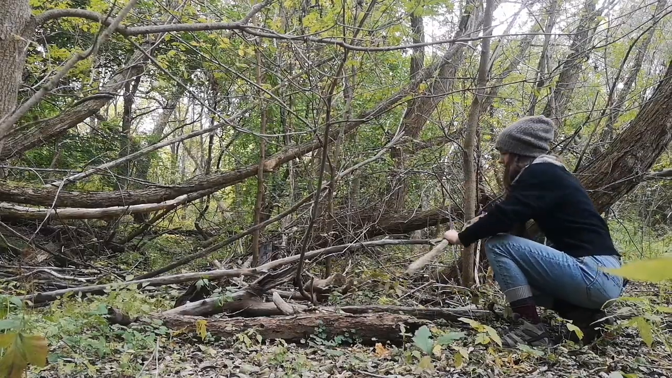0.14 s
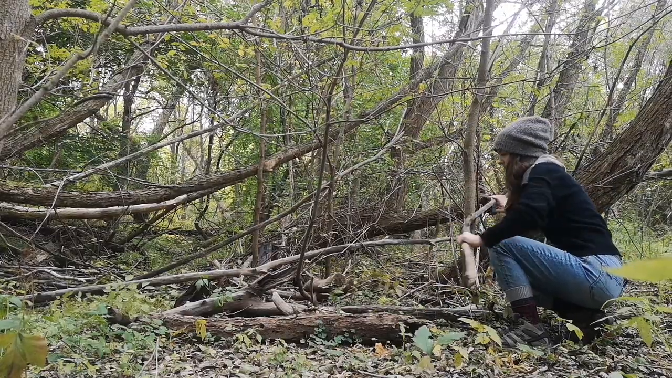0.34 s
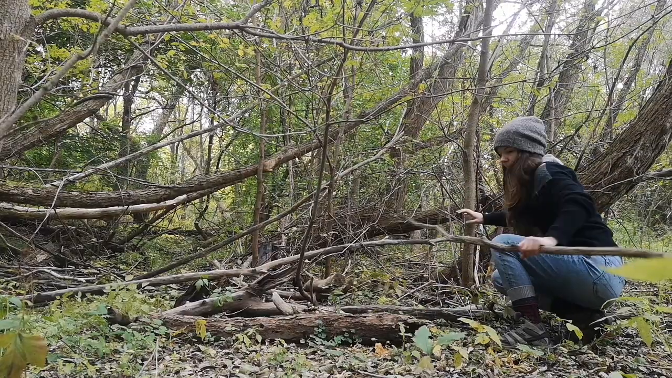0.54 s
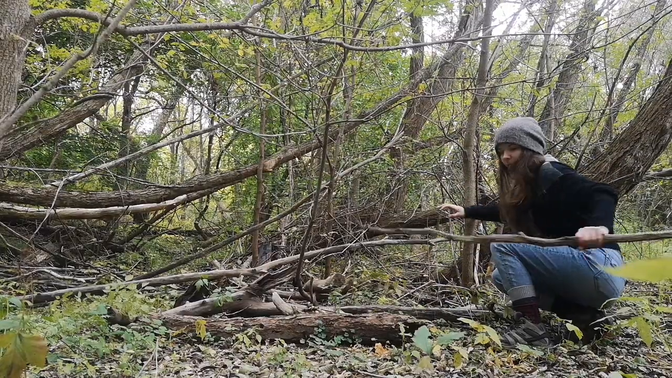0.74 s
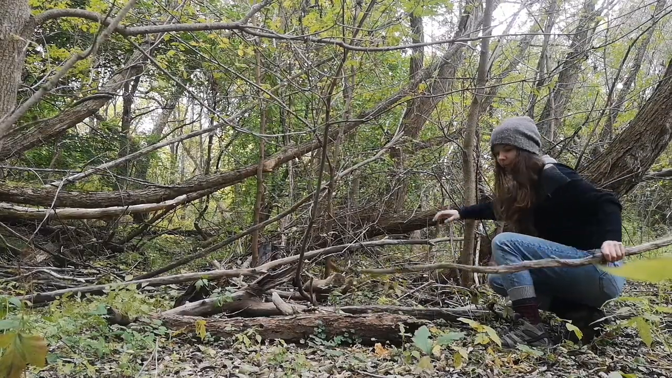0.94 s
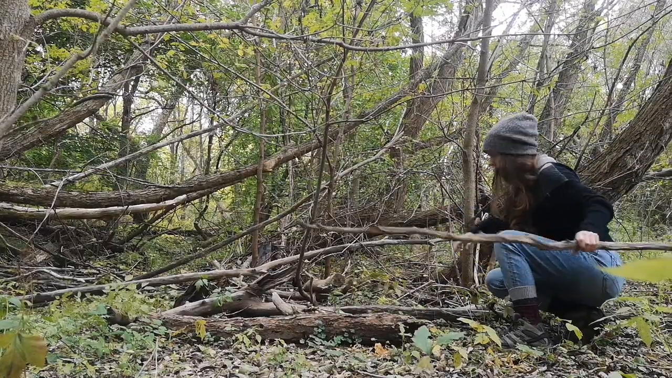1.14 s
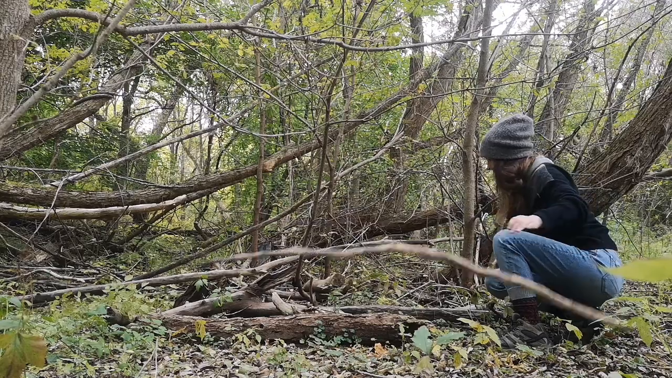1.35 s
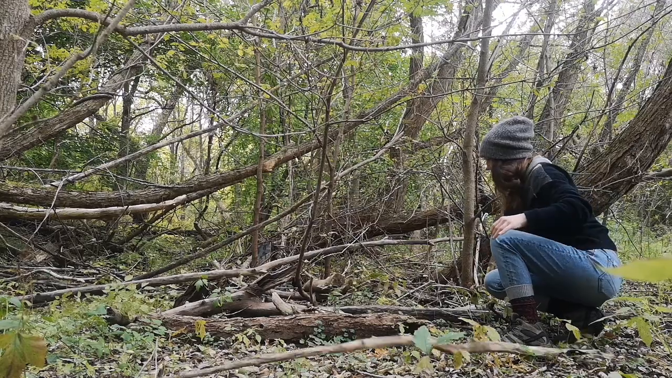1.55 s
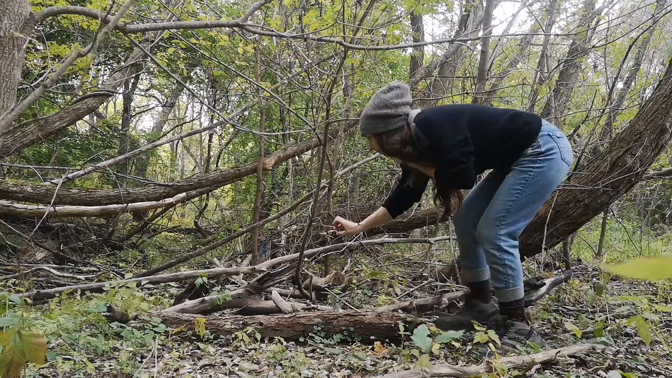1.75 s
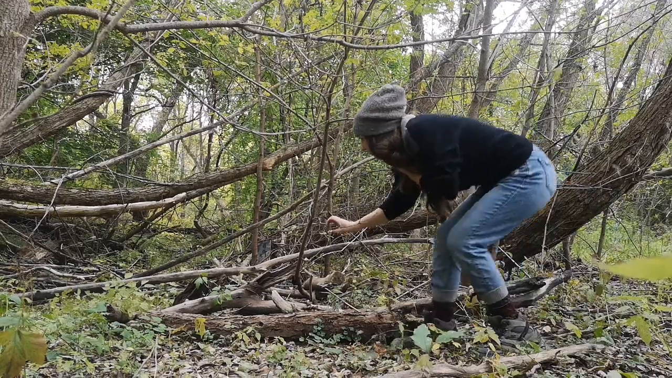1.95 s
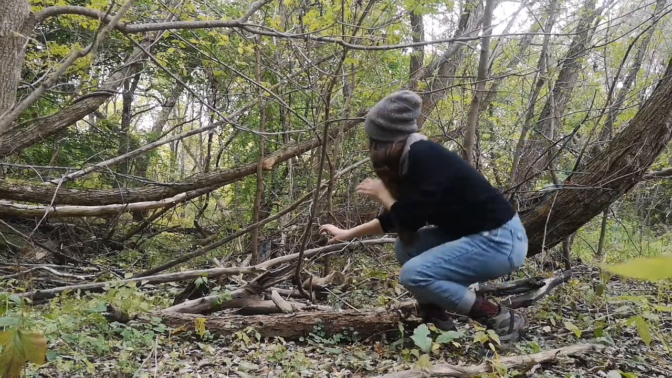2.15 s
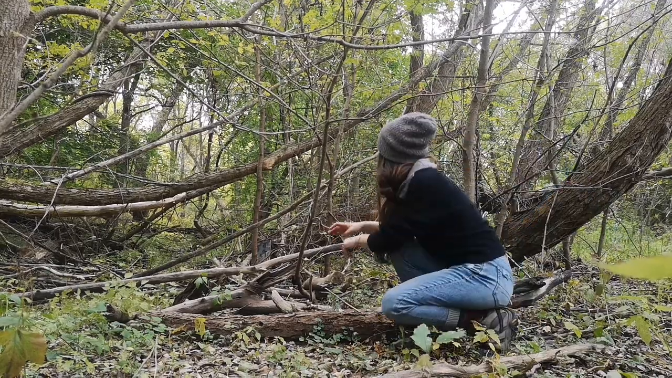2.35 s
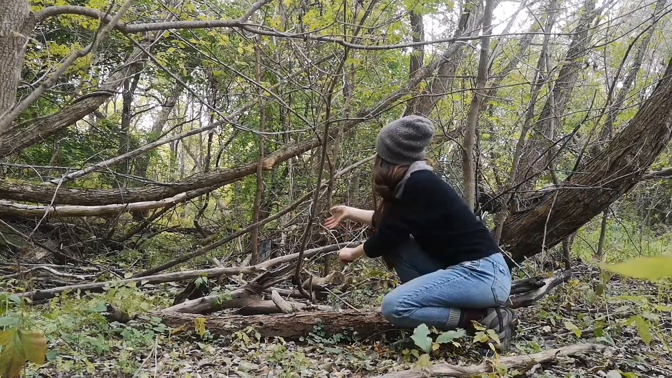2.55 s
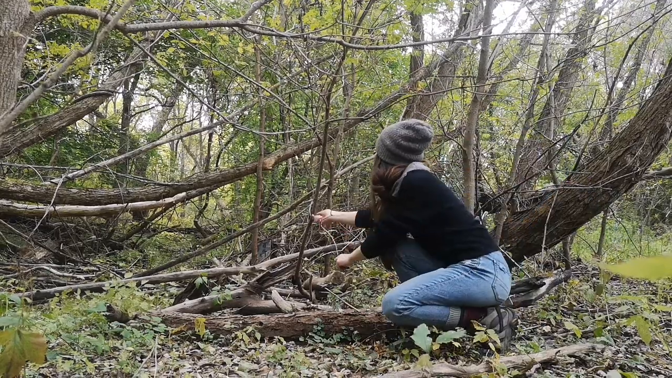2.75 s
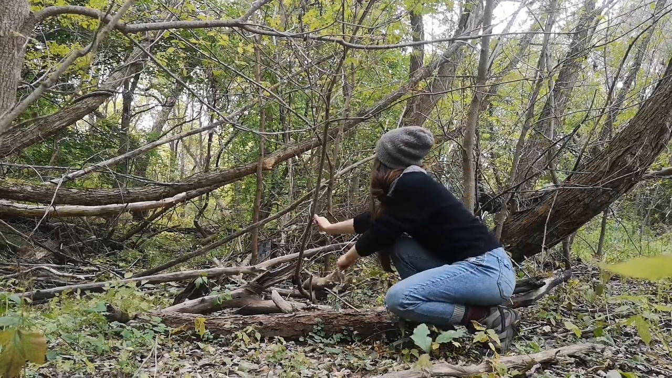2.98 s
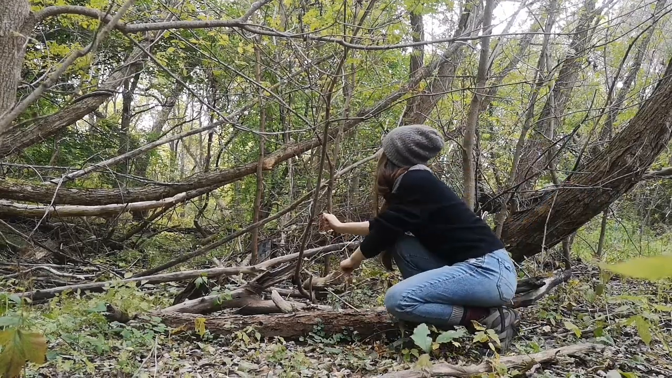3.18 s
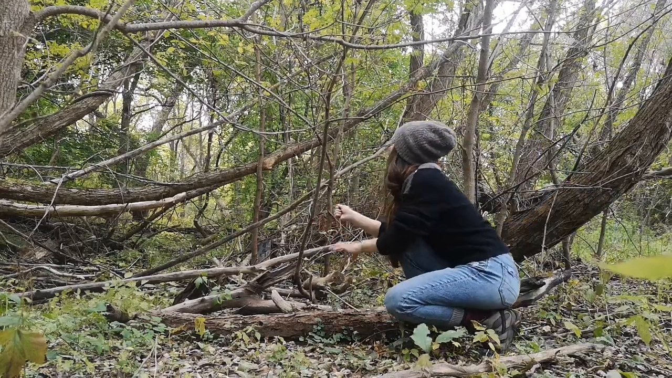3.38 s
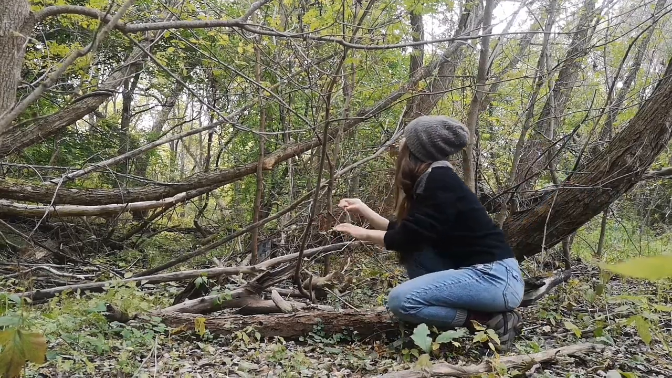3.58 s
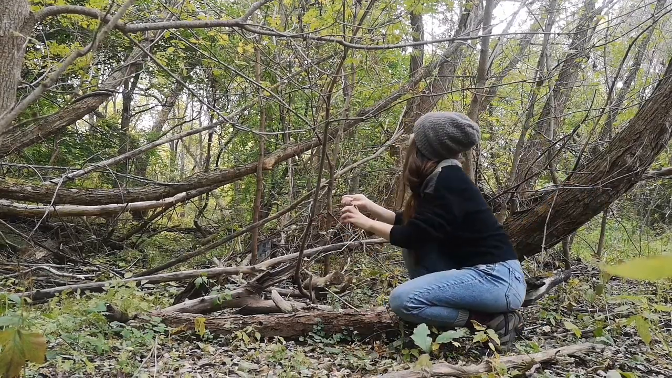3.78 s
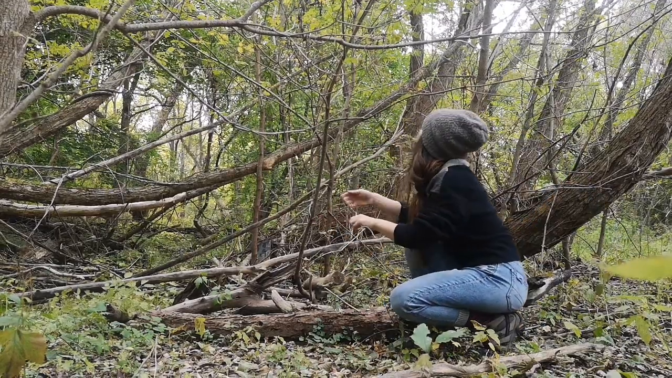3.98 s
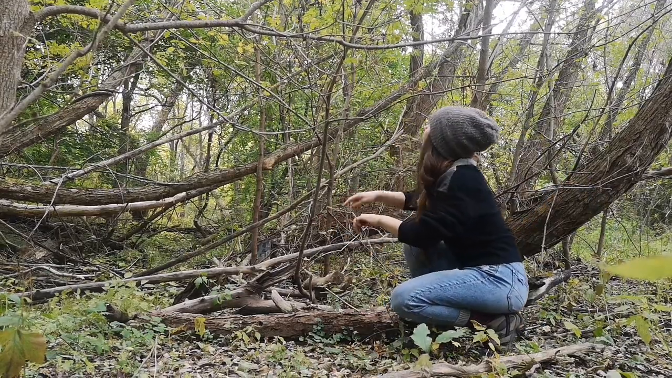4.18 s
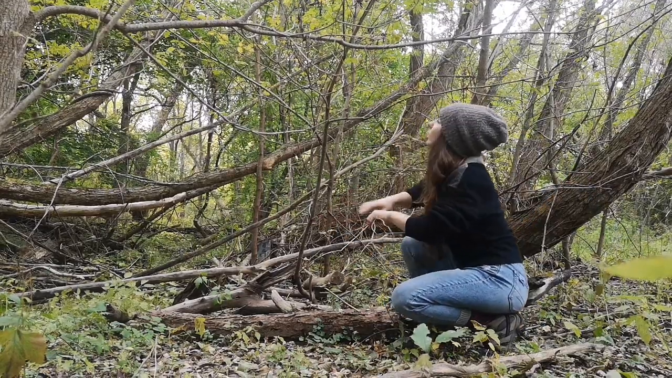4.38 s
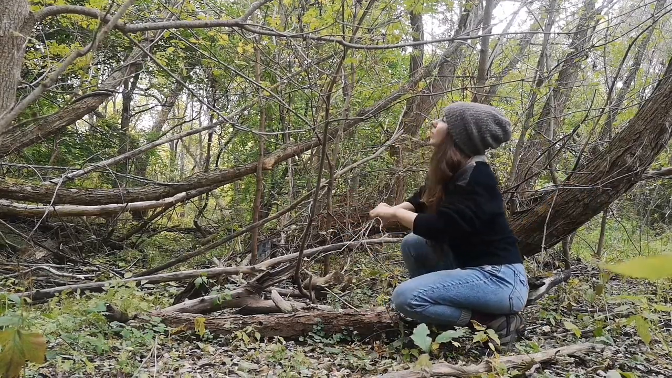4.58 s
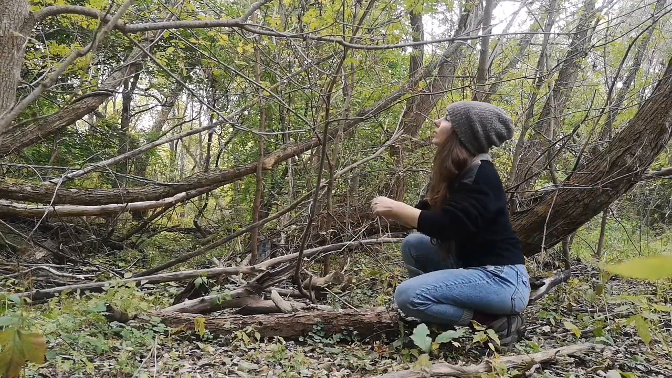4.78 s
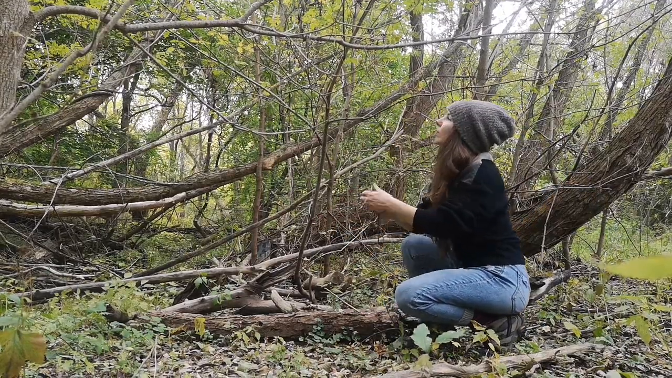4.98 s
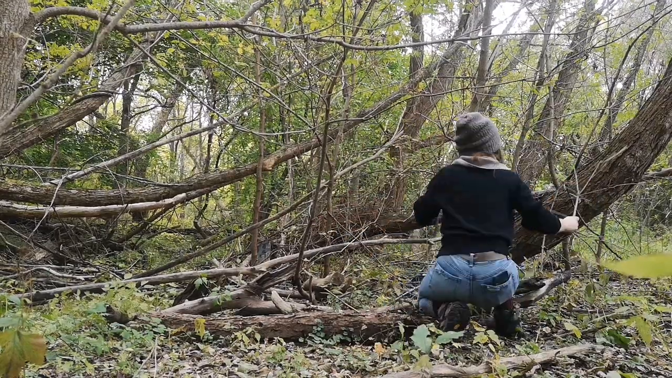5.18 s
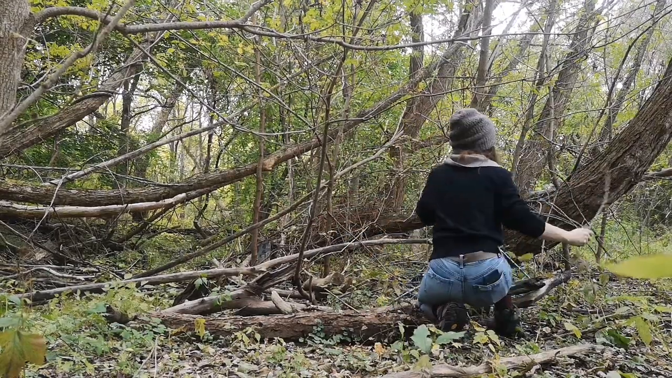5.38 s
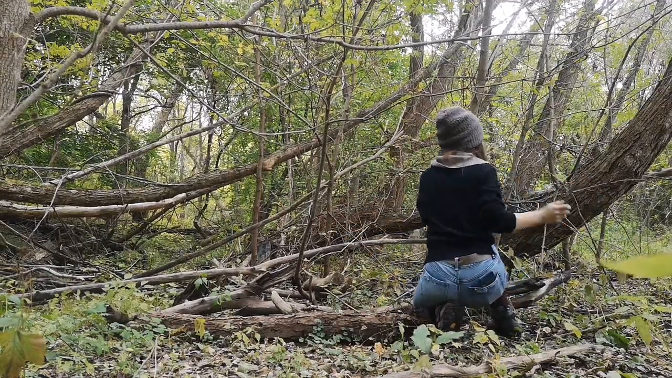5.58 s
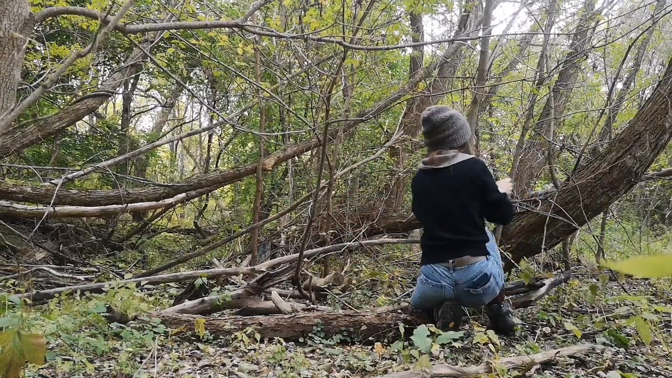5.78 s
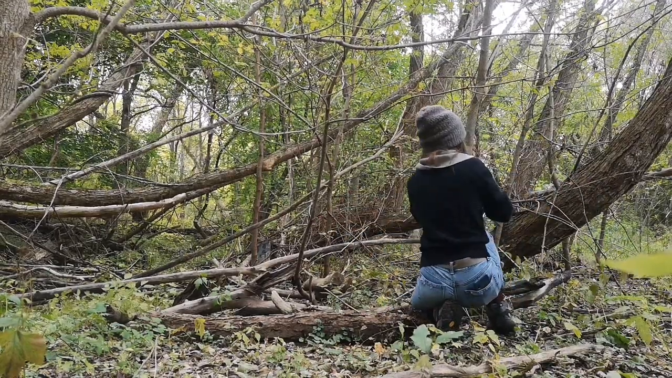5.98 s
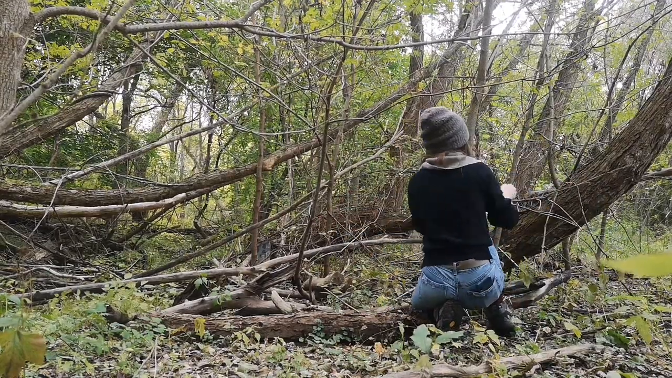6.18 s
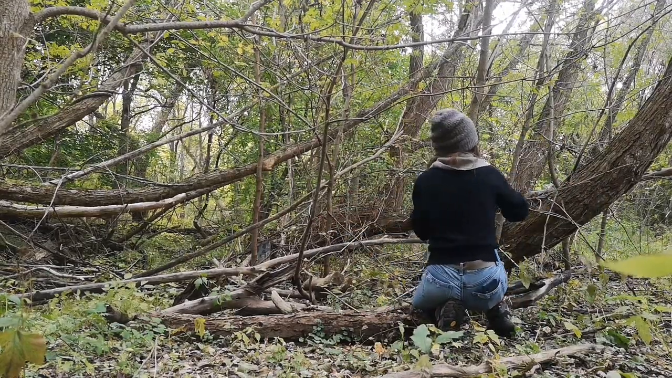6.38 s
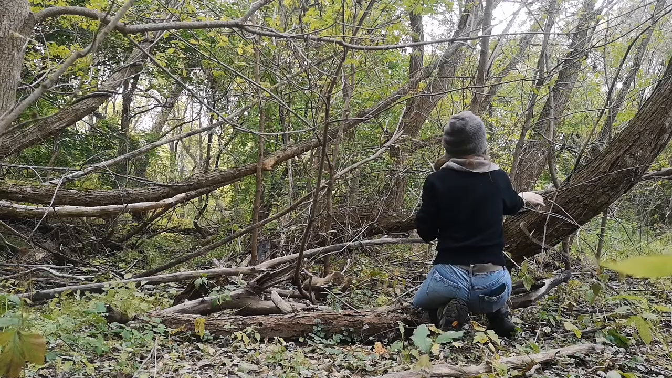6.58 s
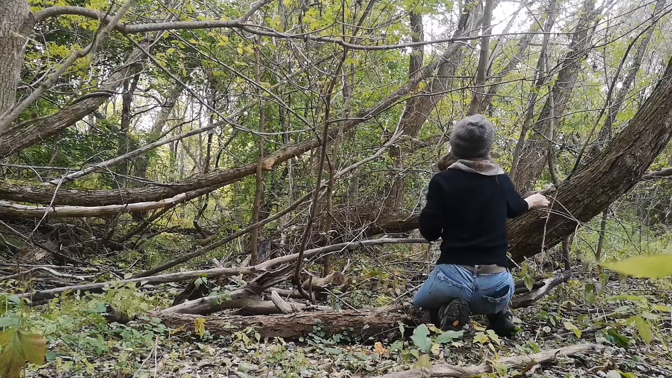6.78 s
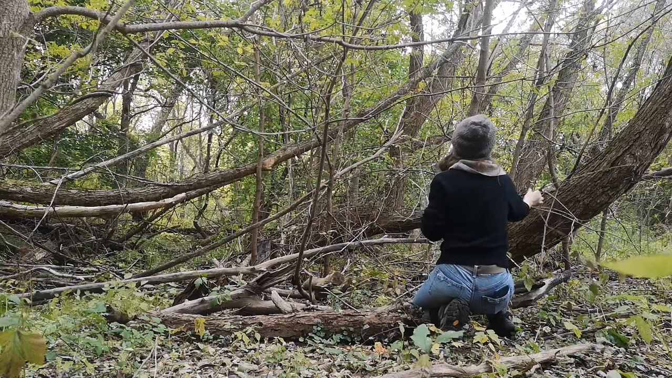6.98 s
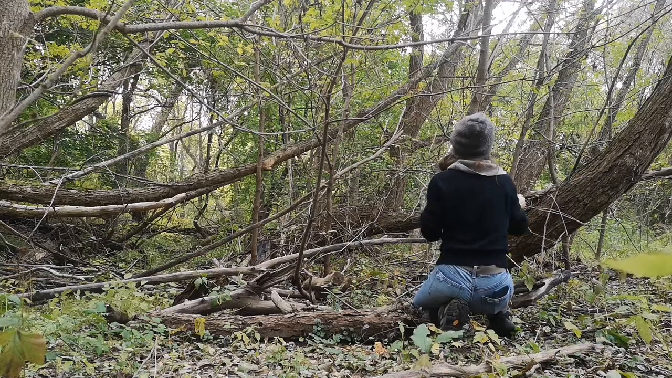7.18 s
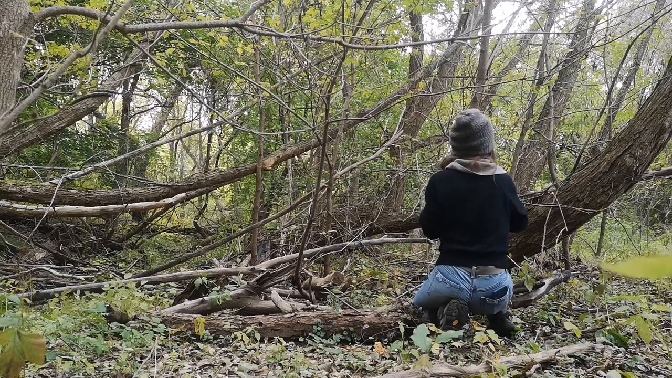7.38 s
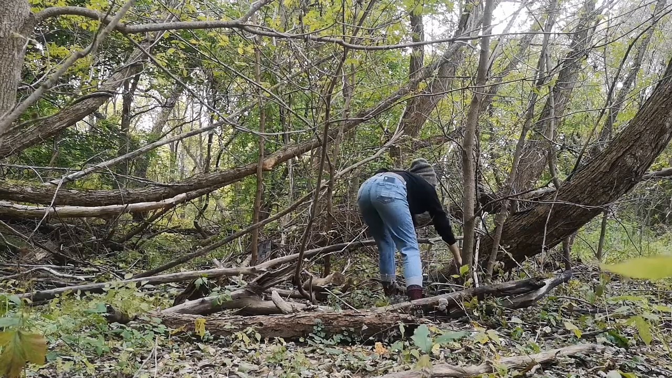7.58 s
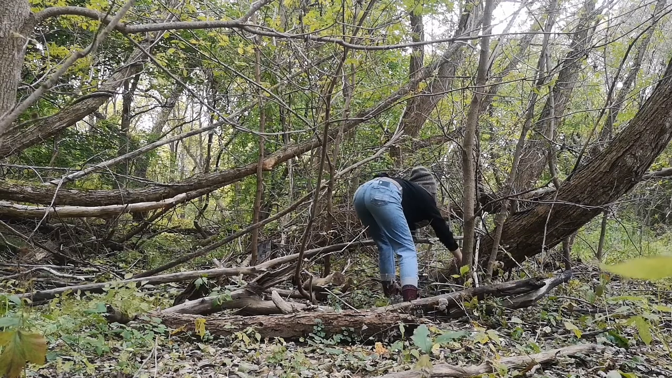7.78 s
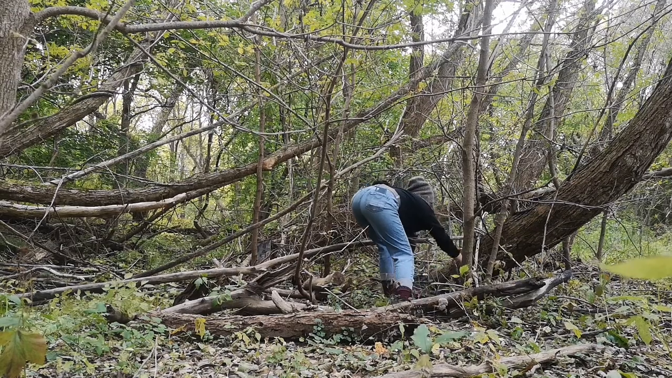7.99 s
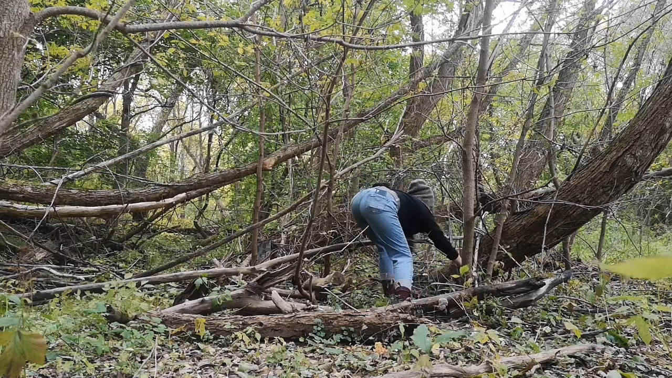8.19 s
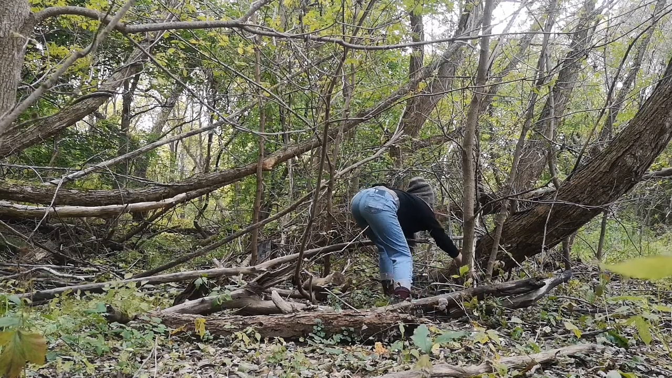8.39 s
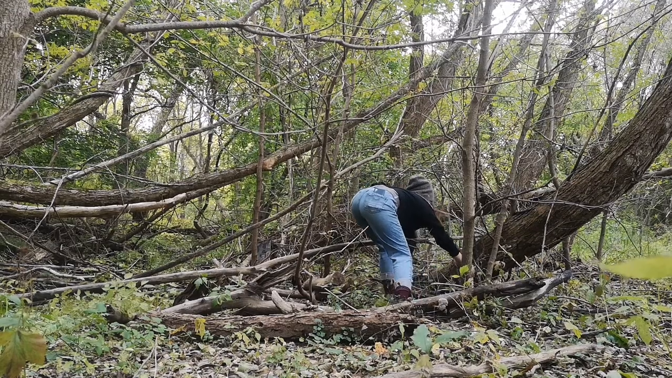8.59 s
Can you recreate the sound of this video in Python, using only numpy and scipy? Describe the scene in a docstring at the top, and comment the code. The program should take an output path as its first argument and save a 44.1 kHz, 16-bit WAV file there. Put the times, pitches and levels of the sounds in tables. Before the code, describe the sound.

Woodland with a low far-road rumble, strongest at first, and faint leaf hiss. At 0.2-0.4 s there is a light scuff, rustle and soft thud, then a tiny crack at 0.7. At 1.45-1.7 a thrown branch lands: quick sharp cracks, loudest near 1.54, hollow wooden knocks, low thuds and a grainy drag through leaves, slightly left. At about 1.73 the background cuts abruptly quieter with a short rustle. Small ticks lead to a very loud dry snap at 2.86, then brittle cracks at 3.9, 4.82 (strong and bright) and 5.28, with a rustle around 5.0 as the background rises slightly. Quiet litter movements follow, then another loud double-edged snap at 6.86. From 7.56 the background shifts subtly again, with a faint distant engine hum; cracks come at 7.71 and 7.84, and one with a deeper thump at 8.15, then light rustling to the end.

```python
"""Twigs snapped in a wood

Dry twigs are snapped by hand: volleys of fibre impulses rung through crack and twig spectra.
Brush, trunks and leaves scatter each crack back as dying noise, and a thrown branch drags and knocks on a log.
Boots and sleeves rustle the litter in noise and ticks, over thuds, bark scuffs and far traffic.
The background steps in level between four stretches."""
import sys
import numpy as np
from scipy import signal
from scipy.fft import rfft, irfft, next_fast_len
from scipy.io import wavfile
from scipy.ndimage import uniform_filter1d, map_coordinates

SR = 44100
rng = np.random.default_rng(int(sys.argv[2]) if len(sys.argv) > 2 else 0)


def write(x):
    x = np.atleast_2d(x).T
    wavfile.write(sys.argv[1], SR, np.round(np.clip(x, -1, 1) * 32767).astype(np.int16))

N = 381024
BINS = np.fft.rfftfreq(2048, 1 / SR)  # frequencies of the pulse spectra [Hz]
SPLIT_HZ = 7260  # brightness lifts what lies above and lowers what lies below

# background of each stretch: (start [s], traffic rumble [dB], tyre rush [dB], leaves in the crowns [dB])
STRETCHES = [(0, -46.5, -55.5, -60), (1.729, -58, -66.5, -71), (5.029, -54.5, -62.5, -65.5),
             (7.562, -53.5, -63, -66.5)]
# hiss of leaves and litter stirred or scattering sound: (frequency [Hz], relative density [dB])
SCATTER = [(880, -56.5), (1500, -12), (3450, -4.5), (5200, 0), (9100, 10.5), (14600, 1), (16000, -28.5)]
# hiss of leaves in the crowns and of the far wood: (frequency [Hz], relative density [dB])
LEAVES = [(1180, -35.5), (2000, -4), (2910, -5.5), (4490, -1), (5630, -4), (9010, 0.5), (11700, -6.5),
          (14700, -9.5), (15600, -20), (16000, -43)]
# near twigs and ground: (frequency [Hz], relative density [dB])
BRUSH = [(700, -21), (1500, -27), (3500, -15.5), (6000, -8.5), (9000, 4), (15000, -4.5), (16500, -13)]


def amp(db):
    """Decibels as a linear gain."""
    return 10 ** (np.asarray(db) / 20)


def unit(x):
    """x scaled to an rms of 1."""
    return x / np.sqrt(np.mean(x ** 2) + 1e-20)


def along(points, hz):
    """(Hz, value) points read along a log frequency axis."""
    f, v = np.transpose(points)
    return np.interp(np.log(hz + 1), np.log(f + 1), v)


def curves():
    """The background levels of the stretch that each sample falls in."""
    start, *levels = np.transpose(STRETCHES)
    stretch = np.searchsorted(start, np.arange(N) / SR, side="right") - 1
    return np.array(levels)[:, stretch]


def wobble(rate):
    """A smooth random curve, rate knots a second."""
    knots = rng.standard_normal(int(N * rate / SR) + 4)
    return map_coordinates(knots, [np.arange(N) * rate / SR])


def filtered(x, response):
    """x times a response of frequency."""
    m = next_fast_len(N + SR // 2)
    return irfft(rfft(x, m) * response(np.fft.rfftfreq(m, 1 / SR)), m)[..., :N]


def pulse(db):
    """The causal pulses with these dB spectra (one per row, on BINS), for sounds that start sharply."""
    cep = irfft(np.log(amp(np.maximum(db, -70))))
    half = cep.shape[-1] // 2
    # folding the cepstrum forward gives minimum phase
    cep[..., 1:half] *= 2
    cep[..., half + 1:] = 0
    return irfft(np.exp(rfft(cep)))


def diffuse(spectrum, grain_db=0, lead=15):
    """Stereo noise of rms 1, the right side lead samples late; grain_db spreads the sizes of its ticks."""
    # left-right likeness: (frequency [Hz], correlation)
    alike = [(60, 0.98), (250, 0.93), (1000, 0.65), (2500, 0.11), (8000, 0.11)]
    pair = rng.standard_normal((2, N)) * amp(grain_db * np.minimum(rng.exponential(size=N), 4))

    def shares(hz):
        turn = np.arccos(np.clip(along(alike, hz), -1, 1)) / 2
        return amp(along(spectrum, hz)) * [np.cos(turn), np.sin(turn)]

    mid, side = filtered(pair, shares)
    return unit(np.array([mid + side, np.roll(mid - side, lead)]))


def swells(start, hold, db, rise, t60):
    """Power of gestures that rise (longer ones more slowly), hold and die, each only within its own stretch."""
    t, edges = np.arange(N) / SR, np.transpose(STRETCHES)[0]
    power, stretch = np.zeros(N), np.searchsorted(edges, t)
    for s, h, level in zip(start, hold, db):
        attack = np.clip((t - s) / (rise + 0.24 * h), 0, 1)
        decay_db = 60 * np.maximum(t - s - rise - h, 0) / t60
        own_stretch = stretch == np.searchsorted(edges, s + rise + h / 2)
        power += (attack * amp(level - decay_db)) ** 2 * own_stretch
    return power


def crackle(level, rate, spread_db):
    """Separate small splinters and leaf stems breaking at random, rate a second, their size following level."""
    hits = (rng.random(N) < rate / SR) * rng.choice([-1, 1], N)
    sizes = amp(spread_db * np.minimum(rng.exponential(size=N), 3))
    tick = pulse(along(BRUSH, BINS))
    left = signal.fftconvolve(hits * sizes * level, tick / np.linalg.norm(tick))[:N]
    return np.array([left, np.roll(left, 6)])


def patchy(x, depth_db):
    """x with short random patches of gain in time and frequency."""
    z = signal.stft(x, nperseg=256)[2]
    field = uniform_filter1d(rng.standard_normal(z.shape[1:]), size=6, axis=0)
    field = uniform_filter1d(field, size=3, axis=1)
    gain = amp(depth_db * (unit(field) - depth_db / 8.7))  # the offset holds the mean power
    return signal.istft(z * gain, nperseg=256)[1][:, :N]


def traffic():
    """A far road: noise for rumble and tyre rush, wavering sines for engine hums; apart from it, a thin high
    whine."""
    # road rumble: (frequency [Hz], relative density [dB])
    rumble = [(12, -33), (20, -14.5), (54, 0), (92, -3), (119, -5), (166, -10.5), (201, -11), (400, -28.5),
              (520, -59), (880, -120)]
    # tyre rush: (frequency [Hz], relative density [dB])
    rush = [(150, -33), (250, -4.5), (501, -5), (949, -2), (1780, -10), (2110, -11.5), (4000, -18),
            (5200, -83)]
    # hums and whine: (start [s], end [s], frequency [Hz], width of its wander [Hz], mean level [dB])
    hums = [(0, 0.84, 58.9, 4.9, -48), (6.875, 7.32, 91.8, 8.7, -54), (7.56, 8.61, 109.7, 6.7, -53),
            (7.71, 8.68, 205.5, 11, -62), (8.052, 8.643, 293, 12, -64), (0, 1.45, 12040, 8, -76)]
    rumble_db, rush_db = curves()[:2]
    out = amp(rumble_db + 1.7 * wobble(2.9)) * diffuse(rumble)
    out += amp(rush_db + 1.4 * wobble(6)) * diffuse(rush)
    t = np.arange(N) / SR
    for start, end, hz, width, db in hums:
        pitch = hz + 0.2825 * width * wobble(width)
        tone = np.sin(2 * np.pi * np.cumsum(pitch) / SR)
        gate = np.clip(np.minimum(t - start, end - t) / 0.042, 0, 1)
        out += amp(db + 1.0 * wobble(8)) * gate * tone
    return out


def litter():
    """Dry leaves under boots and in the crowns: dense ticks whose level shivers, with separate crackles."""
    # boots and sleeves in the litter: (start [s], hold [s], level [dB])
    rustles = [(0.296, 0.64, -62.5), (0.308, 0.024, -50.5), (1.738, 0.2, -54), (3.27, 0.091, -68.5),
               (3.388, 0.02, -58.5), (4.984, 0.4, -53.5), (5.634, 0.38, -68.5), (5.91, 0.03, -53),
               (6.755, 0.082, -51.5), (7.219, 0.0076, -57), (7.294, 0.024, -58), (7.525, 0.063, -62),
               (7.708, 0.0094, -43.5), (8.297, 0.57, -62.5), (8.515, 0.012, -58.5)]
    crowns = amp(curves()[2])
    near = np.sqrt(swells(*np.transpose(rustles), rise=0.003, t60=0.2))
    hiss = crowns * diffuse(LEAVES, grain_db=2.5) + near * diffuse(SCATTER, grain_db=4.0)
    shiver = amp(1.4 * wobble(23))
    return shiver * hiss + crackle((crowns + near) * amp(4.0), 90, spread_db=5.5)


def scuffs():
    """Bark scuffed by a hand or sleeve: short grainy rubs of noise in the woody band."""
    # rubs: (start [s], hold [s], level [dB])
    rubs = [(0.2, 0.011, -48.5), (0.306, 0.01, -56), (5.915, 0.01, -58)]
    # bark: (frequency [Hz], relative density [dB])
    bark = [(700, -25), (1900, -0.5), (3400, -7), (6000, -27)]
    return np.sqrt(swells(*np.transpose(rubs), rise=0.0084, t60=0.15)) * diffuse(bark, grain_db=5.5)


def thuds():
    """Weight landing on soft ground or rotten wood: a low push and two weaker rebounds."""
    # landings: (time [s], peak level of the push [dB])
    landings = [(0.313, -38.5), (1.447, -42), (1.519, -39), (1.542, -36.5), (1.677, -36.5), (3.097, -51.5),
                (7.712, -44), (8.149, -31)]
    # thump: (frequency [Hz], relative level [dB])
    thump = [(60, -41), (200, 4), (450, 2.5), (900, -2.5), (2500, -47)]
    push = pulse(along(thump, BINS))
    push /= np.abs(push).max()
    out = np.zeros(N + SR)
    for (s, db), late in zip(landings, rng.random((len(landings), 2))):
        first, second = 0.00296 + 0.00647 * late[0], 0.00807 + 0.0072 * late[1]
        for after, loss_db in [(0, 0), (first, 6), (second, 9)]:
            out[round((s + after) * SR):][:len(push)] += amp(db - loss_db) * push
    return np.array([out[:N], np.roll(out[:N], 6)])


def fibre_volleys(count):
    """Fibre impulses of each snap in stereo: a few creak first, then the rest part at once and die."""
    draw = rng.random((count, 4, 48))
    delay = .007 * draw[:, :2]
    delay[:, 0, 0], draw[:, 2, 0] = .002, 1  # the core of the twig parts at 2 ms
    # both sides share 16 impulses; each also hears its own bounces
    delay[:, 1, :16] = delay[:, 0, :16]
    after = delay - .002
    envelope = np.where(after < 0, amp(-18 + 2700 * after), amp(-60 * after / 0.013))
    size = envelope * (draw[:, 2:] - .5)
    size[:, 1, :16] = size[:, 0, :16]
    at = np.round(delay * SR).astype(int) + np.array([0, 6])[:, None]  # right side 6 samples late
    volley = np.zeros((count, 2, 400))
    np.add.at(volley, (np.arange(count)[:, None, None], np.arange(2)[:, None], at), size)
    return volley


def answers(s, bright_db, woody_db, twig):
    """Near brush answers within ms and dies fast, the trunks behind it later and longer, the far wood last."""
    u = np.arange(SR // 2) / SR
    tails = np.zeros((2, 2, N))  # below and above the split, in stereo
    splinters = crackle(amp(3.5), 150, spread_db=3.0)
    # (spectrum, source levels [dB], relative level [dB], rise [s], t60 [s])
    layers = [(BRUSH, bright_db, 3, .005, .1), (twig, woody_db, -15, .004, .12),
              (SCATTER, bright_db, -11, .013, .3), (LEAVES, bright_db, -32, .04, 1.2)]
    for spectrum, source_db, level_db, rise, t60 in layers:
        at = np.round(s * SR).astype(int)
        energy = [np.bincount(at, amp(2 * band_db), N) for band_db in source_db]
        shape = (1 - np.exp(-u / rise)) ** 2 * amp(2 * (level_db - 60 * u / t60))
        power = signal.fftconvolve(energy, shape[None], axes=1)[:, None, :N]
        tails += np.sqrt(np.abs(power)) * (diffuse(spectrum, 2.3, lead=6) + splinters)
    tails *= amp(1.94 * wobble(220))
    low = filtered(tails[0] - tails[1], lambda hz: 1 / (1 + (hz / SPLIT_HZ) ** 4))
    return patchy(tails[1] + low, 1.75)


def snaps():
    """Each snap is a volley of breaking fibres ringing crack and twig; the wood answers with a dying hiss."""
    # snaps: (time [s], crack level [dB], twig ring [Hz], body relative level [dB],
    #         scatter relative level [dB], brightness [dB])
    breaks = [(0.7066, -41, 1400, -22, -7.5, -7), (1.4472, -31.5, 5450, 4, -12, -6),
              (1.518, -20, 1640, -13, -8, -1), (1.5404, -13, 2170, -11.5, -15.5, -3.5),
              (1.7153, -35, 2820, 1.5, -19, 7), (2.28, -39.5, 1420, -29, -19.5, 4.5),
              (2.7295, -25, 3400, -16, -20, 4.5), (2.8605, -5.5, 2080, -19.5, -18.5, -2.5),
              (2.871, -30, 5140, -17, -19, -3), (2.9327, -43, 3120, 0.5, -16, 3),
              (3.0988, -32.5, 2480, -28, -20, -5.5), (3.896, -18.5, 1510, -21.5, -25.5, 7.5),
              (3.8953, -28.5, 5330, -6, -39, 8), (4.4934, -44, 2330, -19, -15, -3),
              (4.757, -31.5, 3100, -18, -24, 3), (4.7745, -23.5, 3650, -9, -19, 5),
              (4.8182, -8.5, 3960, -17.5, -24, 1), (4.831, -31, 4400, -15, -11, 5),
              (5.275, -14, 5800, -26, -16, -0.5), (5.299, -31, 5500, -11, -22, -3),
              (5.3537, -32, 4770, -24, -19, -5), (5.6947, -37, 1380, -14, -12, 0),
              (6.5027, -44, 4960, -26, -7.5, -6), (6.7618, -36, 5030, -11, -12.5, -5.5),
              (6.86, -7, 2210, -25.5, -18, 0), (6.867, -17, 2600, -21, -16, 6),
              (6.879, -35, 5000, -21, -20, 5), (7.134, -38.5, 1420, -20, -26, -6),
              (7.712, -18, 4430, -24, -12.5, -7.5), (7.7197, -31, 2100, -7, -16, -8),
              (7.837, -25, 3920, -14, -17.5, 3.5), (7.853, -37, 4500, -22, -10.5, 5),
              (8.15, -15.5, 2190, -14, -9, -3)]
    # crack: (frequency [Hz], relative level [dB])
    crack_band = [(1760, -29), (3000, -7.5), (3900, -10.5), (5660, -9.5), (6390, -6), (11300, 6),
                  (13300, -6), (15000, -5.5), (16500, -18)]
    # common woody band: (frequency [Hz], relative level [dB])
    twig_band = [(500, -46), (1200, 4.5), (2500, -2.5), (5000, 3), (8000, 1.5)]
    s, db, twig_hz, body_db, scatter_db, tilt_db = np.transpose(breaks)
    volley = fibre_volleys(len(s))
    # each twig has its own broad ring above the common woody band
    ratio = (BINS + 1) / twig_hz[:, None, None]
    detune = (ratio - 1 / ratio) ** 2
    twig = along(twig_band, BINS) - 10 * np.log10(0.025 + detune / (1 + 0.19 * detune))
    tilt = np.tanh(2 * np.log2((BINS + 1) / SPLIT_HZ))
    crack = along(crack_band, BINS) + tilt_db[:, None] * tilt
    out = np.zeros((2, N + SR))
    for colour, part_db in [(crack, db), (twig, db + body_db)]:
        bursts = signal.fftconvolve(volley, pulse(colour).reshape(-1, 1, 2048), axes=2)
        peak = amp(part_db + [[3], [1]]).T[:, :, None]  # left +3 dB, right +1 dB
        bursts *= peak / np.abs(bursts).max(axis=2, keepdims=True)
        for start, burst in zip(s - .0015, bursts):
            out[:, round(start * SR):][:, :burst.shape[1]] += burst
    # source levels below and above the split
    bright_db = db + scatter_db + [-tilt_db, tilt_db]
    woody_db = [db + body_db - 6 * np.log2(twig_hz / 2500)] * 2  # thin twigs hardly stir the woody band
    return out[:, :N] + answers(s, bright_db, woody_db, twig_band)


def knocks():
    """The branch knocks on a log: decaying sine modes, loudest near the frequency each blow strikes."""
    # blows: (time [s], level [dB], frequency around which the modes are struck hardest [Hz])
    blows = [(1.541, -27.5, 1250), (1.5522, -29, 2100), (1.639, -30.5, 1100), (1.645, -41, 1700),
             (1.664, -19, 1570), (1.676, -36, 600)]
    # branch modes: (frequency [Hz], relative level [dB], t60 [s])
    branch = [(623, -18, 0.096), (773, -21, 0.1), (1158, -3.5, 0.11), (1256, -5, 0.092), (1510, 1.5, 0.087),
              (1720, -7.5, 0.058), (2060, -9, 0.082), (2260, -8, .1)]
    strike_db_per_oct = 19.5
    ring, u = np.zeros(N), np.arange(SR // 5) / SR
    for s, db, strike_hz in blows:
        modes = np.zeros(len(u))
        for hz, level, t60 in branch:
            off_strike_db = strike_db_per_oct * abs(np.log2(hz / strike_hz))
            mode_db = level - off_strike_db + rng.normal(0, 1.8) - 60 * u / t60
            modes += amp(mode_db) * np.sin(2 * np.pi * hz * rng.normal(1, 0.004) * u)
        onset = 1 - np.exp(-u / 0.00054)
        ring[round(s * SR):][:len(u)] += amp(db) * modes / np.abs(modes).max() * onset
    ring *= amp(1.3 * wobble(110))  # bark chatters against the log
    ring *= np.arange(N) / SR < STRETCHES[1][0]  # heard only in the first stretch
    return np.array([ring, np.roll(ring, 6)])


def crash():
    """The thrown branch drags through leaves in grainy noise and clatters hollowly on a log."""
    # drags through brush: (start [s], hold [s], leaves level [dB], wood relative to leaves [dB])
    drags = [(1.441, 0.0052, -38.5, -9), (1.518, 0.0088, -44, 2), (1.557, 0.013, -35.5, -29),
             (1.616, 0.085, -40.5, -4.5)]
    # rubbed wood: (frequency [Hz], relative density [dB])
    wood_band = [(150, -30), (250, -20), (371, -13.5), (885, -11.5), (1160, -9.5), (1470, -12),
                 (4000, -20.5), (5600, -60)]
    start, hold, leaf_db, wood_db = np.transpose(drags)
    rise, t60 = 0.0029, 0.34  # s
    leaf = np.sqrt(swells(start, hold, leaf_db, rise, t60))
    wood = np.sqrt(swells(start, hold, leaf_db + wood_db, rise, t60))
    drag = leaf * diffuse(SCATTER, 2.5, lead=2) + wood * diffuse(wood_band, 4.3, lead=6)
    drag = patchy(amp(1.7 * wobble(60)) * drag, 4.0)
    drag += crackle(leaf * amp(-6.0), 300, spread_db=7.0)
    return (drag + knocks()) * amp([[1.5], [-1.5]])  # leaning left


def scene():
    """All sources together."""
    return traffic() + litter() + scuffs() + thuds() + snaps() + crash()


def record(dry):
    """The treble falls steeply above 15.1 kHz, and nothing is kept from the band limit up."""
    top_hz = 16700
    treble = [(15100, 2.0), (15500, -29.0), (16600, -20)]  # (frequency [Hz], gain [dB])
    return filtered(dry, lambda hz: amp(along(treble, hz)) * (hz < top_hz))


dry = scene()
out = record(dry)
write(out)
```